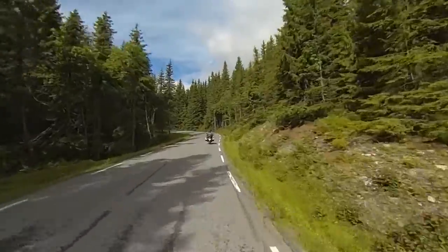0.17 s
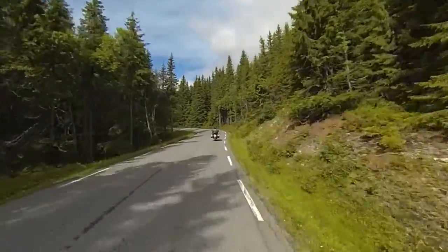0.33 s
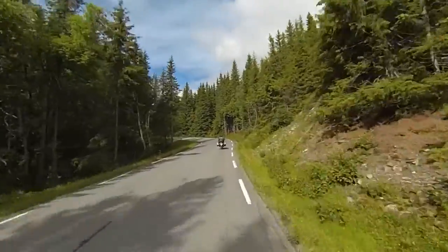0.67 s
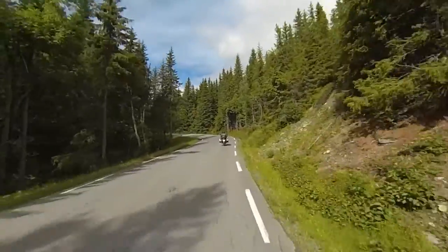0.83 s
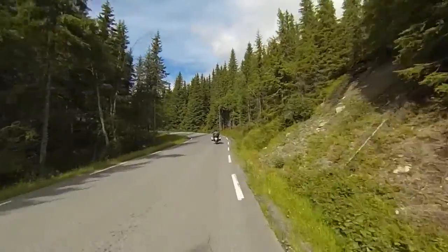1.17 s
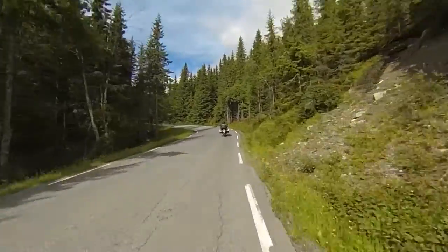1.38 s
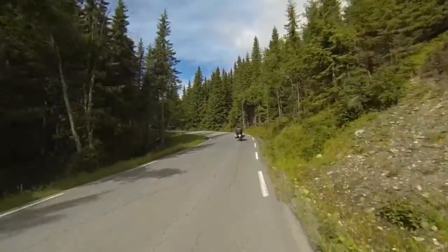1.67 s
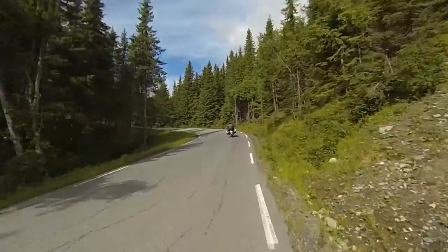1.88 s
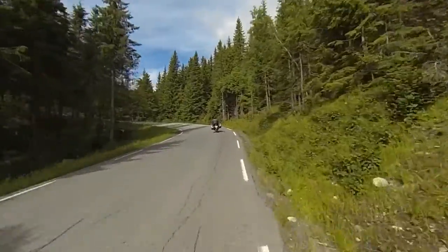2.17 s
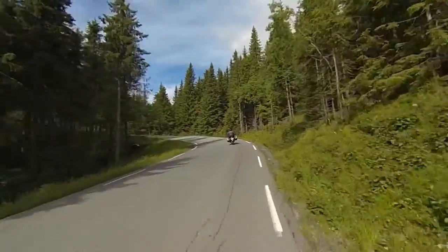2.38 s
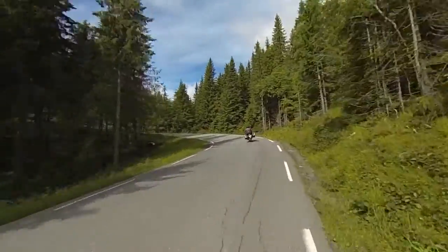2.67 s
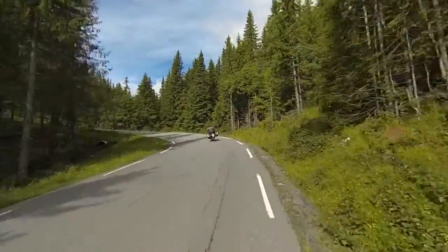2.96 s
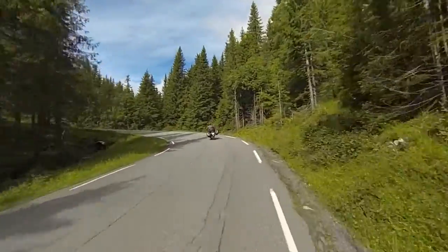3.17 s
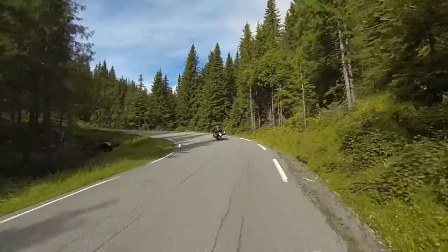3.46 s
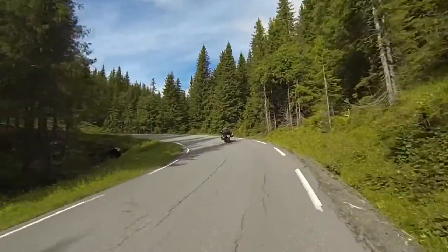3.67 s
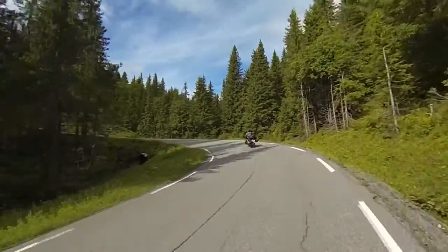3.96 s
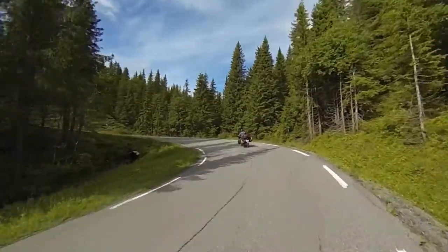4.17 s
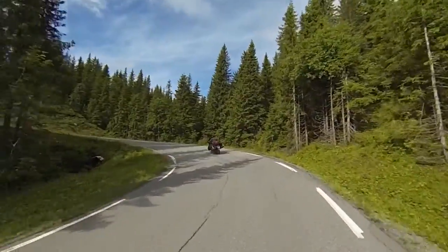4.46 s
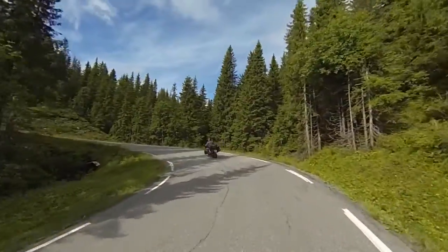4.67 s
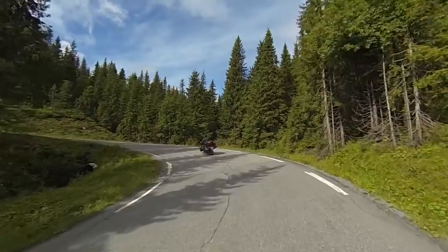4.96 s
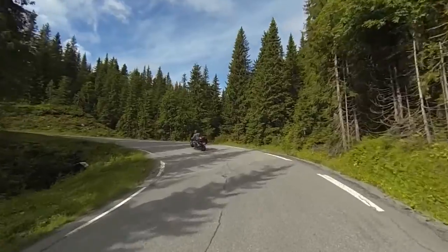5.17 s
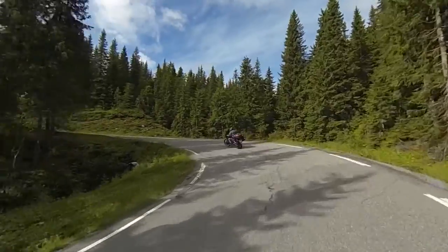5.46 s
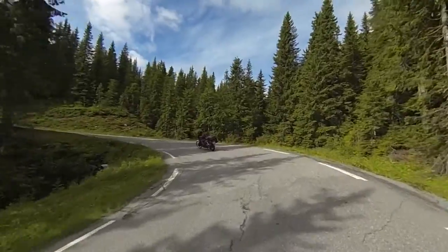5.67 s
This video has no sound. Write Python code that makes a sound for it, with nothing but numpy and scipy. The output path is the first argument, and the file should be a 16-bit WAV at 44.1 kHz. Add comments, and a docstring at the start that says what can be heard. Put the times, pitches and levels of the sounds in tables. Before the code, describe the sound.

Loud hollow wind roar with low thumps drops away while a motorcycle decelerates, leaving a low engine throb, ticking, whine and brief gust hisses.

```python
"""Twin-cylinder motorcycle slowing before a bend

Heard from a camera riding on the bike. Wind, shaped noise led by an air-speed curve, buffets the camera case
and rings its hollow near 1.4 kHz. As the speed drops, the exhaust beat (sines at multiples of the cycle rate),
valve clatter (decaying noise knocks) and gear whine (narrow noise bands) come through. Dry squeaks and short
gust hisses are timed noise; the camera electronics whistle faintly in bursts over a hiss."""
import sys
import numpy as np
from scipy import signal
from scipy.fft import rfft, irfft, next_fast_len
from scipy.io import wavfile
from scipy.ndimage import uniform_filter1d

SR = 44100
rng = np.random.default_rng(int(sys.argv[2]) if len(sys.argv) > 2 else 0)


def store_wav(level_fs):
    """Save 16-bit WAV to argv[1]."""
    pcm = np.round(np.clip(np.atleast_2d(level_fs), -1, 1) * 32767)
    wavfile.write(sys.argv[1], SR, pcm.T.astype(np.int16))


N = 257103
T = np.arange(N) / SR

# engine speed in four-stroke cycles, crank turns twice as fast: t/s, cycle rate/Hz
CYCLE_RATE = [(0, 25.8), (.5, 25.7), (1.45, 27.4), (2.15, 27.6), (3.5, 21.3), (3.78, 21.9), (3.88, 20.85),
              (5.83, 17.4)]
# narrow resonances of the camera case: f/Hz, width/Hz, lift/dB
CASE_MODES = [(610, 50, 2), (2360, 150, 3), (2760, 160, -2), (2930, 70, 3), (3110, 120, 4), (3260, 90, -3),
              (4660, 120, 3), (5120, 120, 2), (5620, 380, 3)]


def undb(db):
    """Decibels to gain."""
    return 10 ** (np.asarray(db) / 20)


def unit(x):
    """Scale to rms 1."""
    return x / np.sqrt(np.mean(x ** 2))


def curves(table):
    """Columns of a table of timed rows, interpolated to one value per sample."""
    s, *columns = np.transpose(table)
    return [np.interp(T, s, column) for column in columns]


def colour(x, points, peaks=()):
    """Shape a sound by a spectrum (f/Hz, level/dB) and narrow resonances; rms 1."""
    size = next_fast_len(N)
    f = np.maximum(np.arange(size // 2 + 1) * SR / size, 1)
    hz, db = np.transpose(points)
    shape_db = np.interp(np.log(f), np.log(hz), db)
    # beyond the listed range: fall in dB per octave
    shape_db = shape_db - 24 * np.maximum(np.log2(f / hz[-1]), 0)
    shape_db = shape_db - 12 * np.maximum(np.log2(hz[0] / f), 0)
    for centre_hz, width_hz, lift_db in peaks:
        shape_db = shape_db + lift_db / (1 + (2 * (f - centre_hz) / width_hz) ** 2)
    return unit(irfft(rfft(x, size) * undb(shape_db), size)[:N])


def noise():
    """White noise, rms about 1."""
    return rng.standard_normal(N)


def walk(rate_hz):
    """Random levels held 1 / rate_hz and smoothed twice over that time; rms 1."""
    k = max(int(SR / rate_hz), 2)
    held = noise()[np.arange(N) // k]
    return unit(uniform_filter1d(uniform_filter1d(held, k), k))


def band(phase_turns, width_hz):
    """Narrow noise band around a carrier: random walks modulate its cosine and sine."""
    angle = 2 * np.pi * phase_turns
    return walk(width_hz) * np.cos(angle) + walk(width_hz) * np.sin(angle)


def swells(table):
    """Gain summed from one flat-topped swell per row: middle/s, length/s, level/dB."""
    return sum(undb(db) * np.exp(-(2 * np.abs(T - s) / length_s) ** 4 / 2) for s, length_s, db in table)


def airflow(full_db, slope):
    """Wind-layer gain: full_db at full speed, losing slope dB per dB drop of the air stream."""
    # air-stream strength, falling as the bike slows: t/s, level/dB
    air_stream = [(0, 0), (.7, 0), (1.05, -4), (1.25, -3), (1.42, -5.5), (2.15, -9.5), (3.0, -16.5),
                  (4.1, -21.5), (4.7, -24.5), (5.83, -23)]
    air_db, = curves(air_stream)
    return undb(full_db + slope * air_db)


def revs(rise_db_per_octave=7):
    """Gain of the moving parts, rising with engine speed; 1 at 20 cycles per second."""
    cycle_hz, = curves(CYCLE_RATE)
    return undb(rise_db_per_octave * np.log2(cycle_hz / 20))


def buffeting(shed_hz=47, wander_hz=3.85, unsteady_db=1.4, shake_limit_db=-31, thump_rumble_db=-13):
    """Eddies shed by the bike shake the case at a wandering low rate, amid rumble and slow pressure sway.

    Steady shaking levels off at speed; large eddies add thumps and lift the rumble."""
    # large eddies thumping the case: middle/s, length/s, level/dB
    thump_rows = [(.29, 0.12, -20.5), (.605, 0.12, -16), (.78, 0.12, -24.5), (1.08, 0.071, -29.5),
                  (1.49, 0.069, -29), (2.02, 0.09, -36), (2.76, 0.049, -33.5)]
    # spectra: f/Hz, level/dB
    rumble_spectrum = [(40, -11), (70, -3), (90, -0.5), (150, 0.5), (175, -2.5), (225, -0.5), (270, -7.5),
                       (305, -21), (450, -29), (900, -44)]
    sway_spectrum = [(3, -8), (8, 2.5), (16, -9), (28, -4.5), (38, -7.5), (48, -13.5), (60, -28),
                     (90, -19.5)]
    thumps = swells(thump_rows)
    steady = np.minimum(airflow(full_db=-18.5, slope=1.36), undb(shake_limit_db))
    eddy_turns = np.cumsum(shed_hz + wander_hz * walk(16)) / SR
    shake = np.sqrt(2) * np.sin(2 * np.pi * eddy_turns) * (steady + thumps) * undb(unsteady_db * walk(20))
    rumble_gain = airflow(full_db=-27.0, slope=.85) + undb(thump_rumble_db) * thumps
    rumble = colour(noise(), rumble_spectrum) * rumble_gain
    sway = colour(noise(), sway_spectrum) * airflow(full_db=-28.5, slope=0.28)
    return shake + rumble + sway


def wind(flutter_db=0.83):
    """Air rushes through the hollow of the case and flutters; at speed it also hisses along the edges."""
    # spectra: f/Hz, level/dB
    rush_spectrum = [(150, -22), (320, -16.5), (470, -21.5), (730, -16.5), (980, -19), (1150, -9),
                     (1350, 1), (1600, -5.5), (1950, -17), (2600, -24.5), (3500, -27), (4100, -38.5),
                     (6000, -49.5), (9000, -55)]
    edge_spectrum = [(2000, 5), (2500, 14), (3200, 6.5), (4200, 0), (5600, 1), (6100, -6), (7900, -6.5),
                     (8600, -21), (9800, -17.5), (14000, -32.5)]
    flutter = undb(flutter_db * walk(70))
    rush = colour(noise() * flutter, rush_spectrum, CASE_MODES) * airflow(full_db=-25.5, slope=1)
    edge = colour(noise() * flutter, edge_spectrum, CASE_MODES) * airflow(full_db=-41.5, slope=1.4)
    return rush + edge


def exhaust(cycle, waver_db=.6):
    """The twin's uneven beat as a sum of orders; closing the throttle shifts weight between them."""
    # throttle: t/s, overall level/dB, overrun/0-1
    throttle = [(0, -37, 0.12), (.7, -28, 0.21), (1.4, -32, 0.09), (2.3, -34.5, 0.66), (3.0, -39, 0.57),
                (3.5, -44.5, 0.27), (3.8, -45, 0.64), (3.92, -40, 1), (5.83, -38.5, 0.96)]
    # exhaust orders: multiple of cycle rate, pulling/dB, coasting/dB, overrun/dB
    orders = [(2, -8, -1, -4), (3, -19.5, -2.5, -4.5), (4, -9.5, -4, -10.5), (5, -6, -9.5, -11),
              (6, -14, -21.5, -4), (7, 0.5, -18, -17.5), (8, -7.5, -23.5, -37), (9, -22, -17.5, -32),
              (10, -12, -24.5, -32), (12, -37, -30, -28), (14, -42, -27.5, -20.5)]
    level_db, overrun = curves(throttle)
    pulling = np.clip(1 - 2 * overrun, 0, 1)
    closed = np.clip(2 * overrun - 1, 0, 1)
    coasting = 1 - pulling - closed
    beat = 0
    for order, pull_db, coast_db, over_db in orders:
        db = pulling * pull_db + coasting * coast_db + closed * over_db
        gain = undb(db + waver_db * walk(9.8))
        beat = beat + gain * np.sin(2 * np.pi * (order * cycle + rng.random()))
    return np.sqrt(2) * beat * undb(level_db)


def clatter(cycle, clatter_db=-48, scatter_db=1.5, whirr_db=-54):
    """Valves knock four times a cycle and ring the case; other parts whirr evenly (levels before revs())."""
    # valve knocks: share of the cycle, level/dB
    knock_rows = [(.17, -4), (.31, -13.5), (.48, -8), (.82, -6.5)]
    # spectra: f/Hz, level/dB
    clatter_spectrum = [(150, -6.5), (260, 2), (310, -10.5), (760, -20.5), (950, -35), (1200, -7),
                        (1400, -1.5), (1650, -1.5), (1850, -14.5), (3500, -36), (4200, -40)]
    whirr_spectrum = [(200, 3.5), (400, 2), (500, -11.5), (780, 5), (950, -15), (1400, 2.5), (1900, 5),
                      (2600, -10.5), (3600, -9), (4200, -20), (5100, -16.5), (8000, -46)]
    knocks = 0
    for share, db in knock_rows:
        turn = cycle + 1 - share
        size = undb(db + scatter_db * noise()[turn.astype(int)])  # one random size per knock
        knocks = knocks + size * np.exp(-(turn % 1) / .12)  # decay in cycles
    valves = colour(knocks * noise(), clatter_spectrum, CASE_MODES)
    whirr = colour(noise(), whirr_spectrum, CASE_MODES)
    return undb(clatter_db) * valves + undb(whirr_db) * whirr


def gears(cycle, whine_db=-46.5, low_whine_db=-63, throb=0.32, smear_db=-1, mesh_order=76,
          full_s=3.75, low_lead_s=.8, swell_db_per_s=15.5):
    """Meshing teeth whine at a multiple of engine speed; uneven crank motion makes it throb.

    The whine swells until full_s, a lower one until low_lead_s earlier (levels before revs())."""
    def swell(end_s):
        """Gain rising steadily in dB to 1 at end_s."""
        return undb(-swell_db_per_s * np.maximum(end_s - T, 0))

    teeth = mesh_order * cycle
    load = unit(1 + throb * np.cos(2 * np.pi * (2 * cycle - .8)))  # once per crank turn
    # narrow line, smeared by play between the teeth
    line = unit(band(teeth, width_hz=55) + undb(smear_db) * band(teeth, width_hz=190))
    whine = undb(whine_db) * swell(full_s) * load * line
    # smaller pair of gears, about an octave lower
    low_whine = undb(low_whine_db) * swell(full_s - low_lead_s) * band(.51 * teeth, width_hz=100)
    return whine + low_whine


def electronics(frame_hz=47.955, whistle_hz=6450, whistle_db=-62, octave_db=-67.0, hiss_db=-72):
    """The camera whistles in a short burst for every frame it reads, over a smooth hiss."""
    # hiss spectrum: f/Hz, level/dB
    hiss_spectrum = [(1000, -4), (5000, 12), (8000, 11), (11000, 3.5), (14000, 5.5)]
    frame = frame_hz * T
    burst = uniform_filter1d(1. * (np.abs(frame % 1 - .51) < .18), 40)  # softened on/off gate
    phase = 2 * np.pi * (whistle_hz * T + noise()[frame.astype(int)])  # random start per frame
    whistle = undb(whistle_db) * np.sin(phase) + undb(octave_db) * np.sin(2 * phase)
    return burst * whistle + undb(hiss_db) * colour(noise(), hiss_spectrum)


def squeaks(cycle, chirp_db=-73, patchy_db=3, rub_start_s=1.57, rub_length_s=1.8):
    """Something dry rubs once per engine cycle: faint uneven high chirps, plus a few louder timed squeaks."""
    # louder squeaks: t/s, f/Hz, width/Hz, level/dB
    squeak_rows = [(1.452, 11700, 2400, -58), (1.487, 11900, 2800, -55.5), (2.285, 11000, 1000, -65),
                   (2.335, 10200, 1300, -70), (2.76, 10400, 1300, -70)]
    shaking = np.sin(np.pi * np.clip((T - rub_start_s) / rub_length_s, 0, 1)) ** .5
    catch = np.sin(np.pi * (cycle + .15 * walk(20))) ** 4
    chirp_spectrum = [(9000, -24), (9900, -2), (10500, 0), (11500, -20)]  # f/Hz, level/dB
    chirps = shaking * catch * undb(patchy_db * walk(25)) * colour(noise(), chirp_spectrum)
    loud = 0
    for s, hz, width_hz, db in squeak_rows:
        envelope = np.exp(-np.abs(T - s) / .011)
        loud = loud + undb(db) * envelope * band(hz * T, width_hz)
    return undb(chirp_db) * chirps + loud


def gusts():
    """Side gusts catch an edge of the case and hiss briefly."""
    # gusts across the case: middle/s, length/s, level/dB
    gust_rows = [(2.54, 0.14, -39), (2.845, 0.088, -45), (3.6, 0.3, -52.5), (3.916, 0.15, -45.5),
                 (4.305, 0.1, -43), (5.416, 0.18, -43), (5.794, .14, -42.5)]
    # hiss spectrum: f/Hz, level/dB
    gust_spectrum = [(600, -18), (1100, -1), (1350, 11), (1900, -1.5), (2450, -1), (2800, -4.5), (3100, -8),
                     (3600, -5.5), (4200, -22.5), (8000, -36)]
    flutter = undb(1.2 * walk(73))
    return swells(gust_rows) * colour(noise() * flutter, gust_spectrum, CASE_MODES)


def scene():
    """Engine, wind and camera, all at one microphone."""
    cycle_hz, = curves(CYCLE_RATE)
    cycle = np.cumsum(cycle_hz * (1 + 0.00292 * walk(13))) / SR  # slightly unsteady
    moving_parts = revs() * (clatter(cycle) + gears(cycle))
    bike = exhaust(cycle) + moving_parts + squeaks(cycle)
    air = buffeting() + wind() + gusts()
    return (bike + air + electronics())[None]


def record(dry, top_hz=14800):
    """The camera cuts the top with a steep low-pass."""
    return signal.sosfilt(signal.ellip(8, .2, 70, top_hz, fs=SR, output="sos"), dry)


dry = scene()
out = record(dry)
store_wav(out)
```